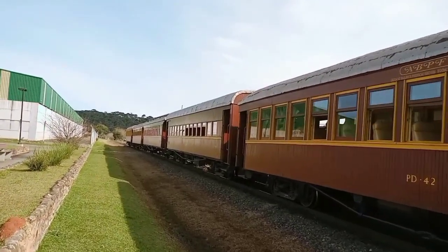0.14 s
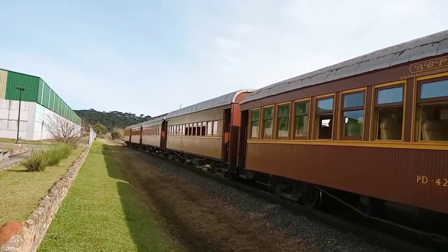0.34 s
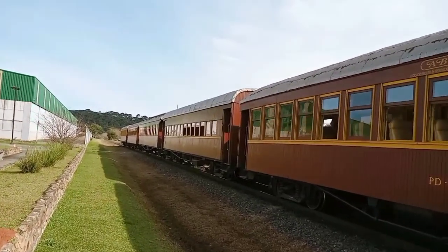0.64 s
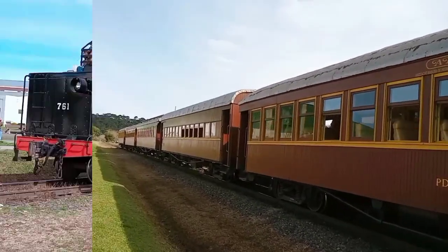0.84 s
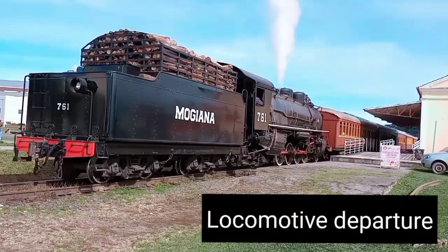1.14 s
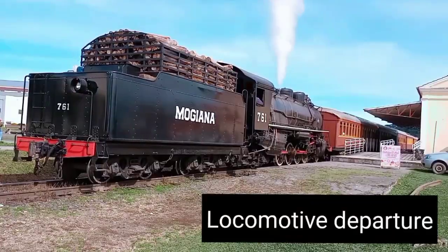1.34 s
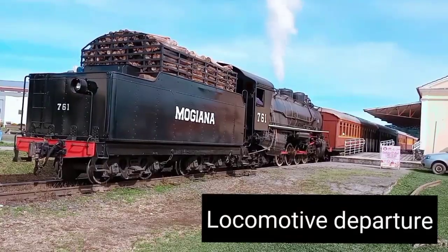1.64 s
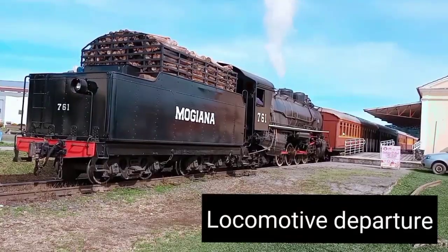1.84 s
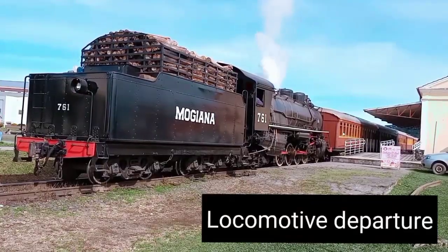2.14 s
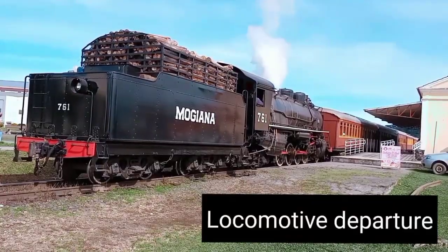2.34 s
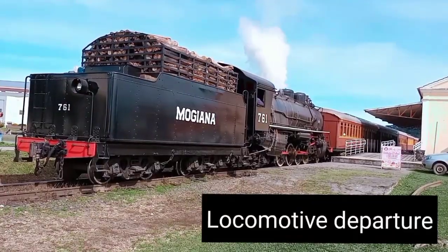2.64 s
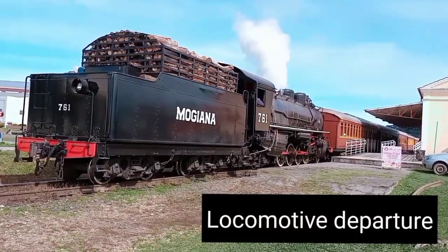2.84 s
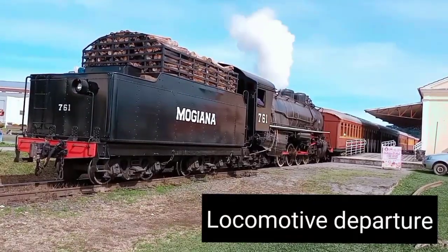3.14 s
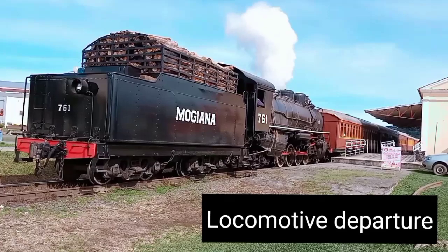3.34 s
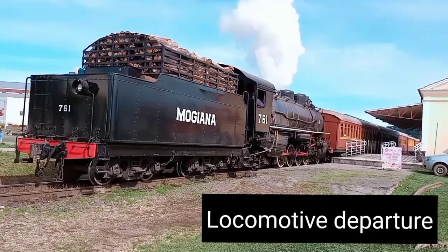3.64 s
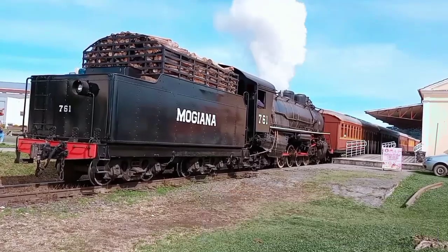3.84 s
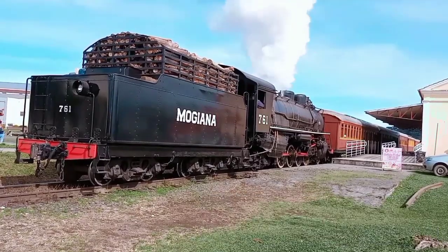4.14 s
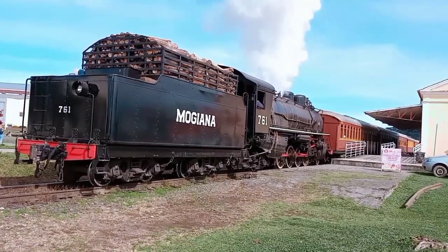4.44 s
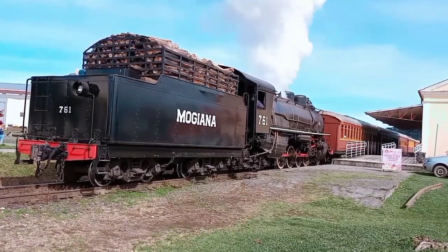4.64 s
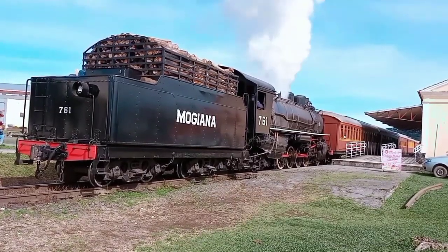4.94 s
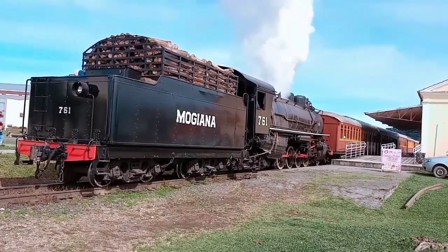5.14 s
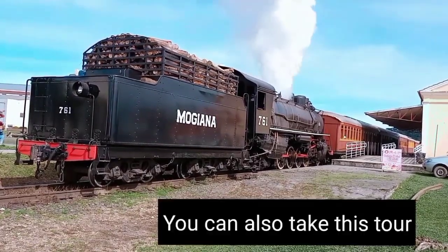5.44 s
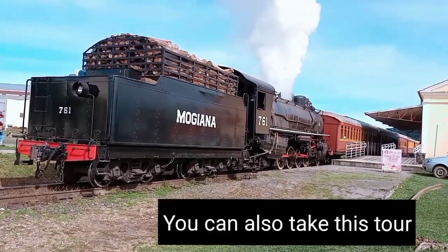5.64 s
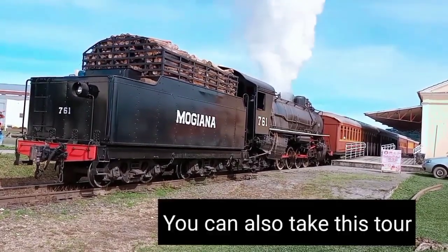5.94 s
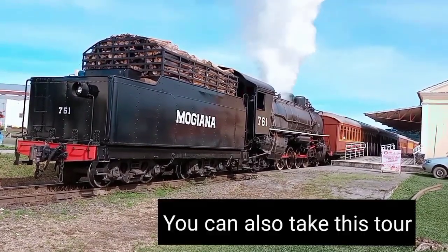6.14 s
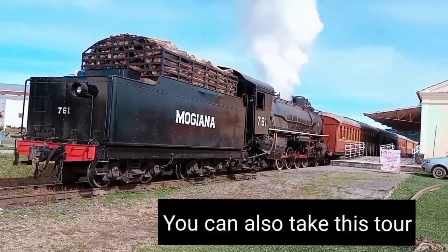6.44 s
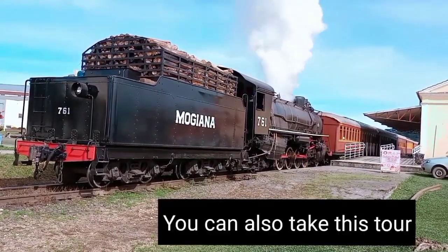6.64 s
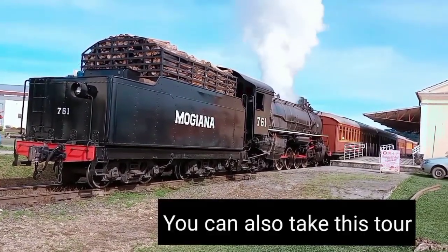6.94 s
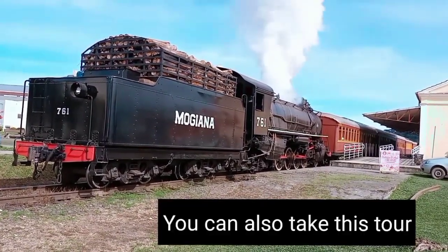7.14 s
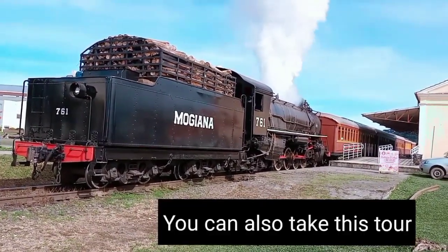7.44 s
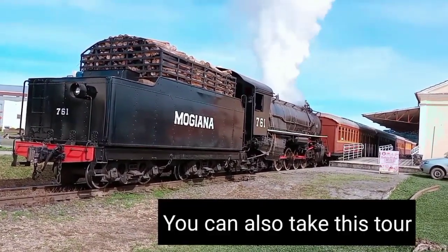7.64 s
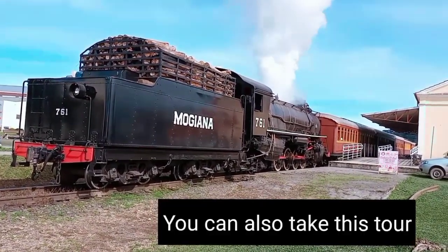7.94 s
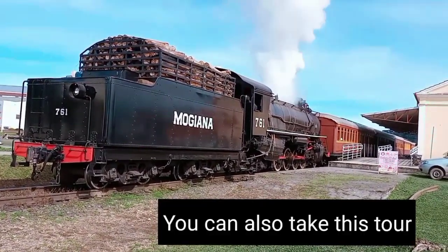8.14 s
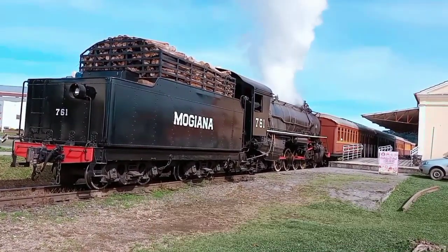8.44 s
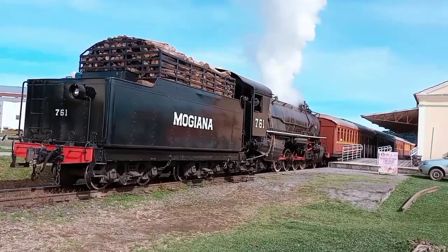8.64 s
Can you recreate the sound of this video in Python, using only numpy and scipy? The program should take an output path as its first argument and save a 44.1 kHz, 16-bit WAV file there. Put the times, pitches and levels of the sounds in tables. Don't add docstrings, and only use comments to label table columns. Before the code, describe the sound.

Quiet wind and faint coupling clinks beside a train, then close steam hiss and a long, loud chorded steam whistle held to the end.

```python
import sys
import numpy as np
from scipy import signal
from scipy.fft import rfft, irfft, next_fast_len
from scipy.io import wavfile
from scipy.ndimage import map_coordinates

SR = 44100
rng = np.random.default_rng(int(sys.argv[2]) if len(sys.argv) > 2 else 0)


def transcribe(signal):
    frames = np.atleast_2d(signal).T
    limited = np.clip(frames, -1, 1)
    pcm = np.round(limited * 32767).astype(np.int16)
    wavfile.write(sys.argv[1], SR, pcm)


def amplitude_ratio(level_db):
    exponent = np.asarray(level_db, float) / 20
    return 10 ** exponent


N = 388080
SECONDS = np.arange(N) / SR
LEFT_ONLY = np.array([[1], [0]])


def unit(x):
    return x / np.sqrt(np.mean(x ** 2, axis=-1, keepdims=True) + 1e-20)


def along(points, hz):
    f, v = np.transpose(points)
    return np.interp(np.log(hz + 1), np.log(f + 1), v)


def curves(rows):
    s, *cols = np.transpose(rows)
    return [np.interp(SECONDS, s, c) for c in cols]


def span(start_s, end_s, fade_s):
    return np.clip((SECONDS - start_s) / fade_s, 0, 1) * np.clip((end_s - SECONDS) / fade_s + 1, 0, 1)


def span_of(rows, fade_s):
    return span(rows[0][0], rows[-1][0], fade_s)


def bump(at_s, half_s):
    return np.exp(-((SECONDS - at_s) / half_s) ** 2)


def wobble(rate):
    knots = rng.standard_normal(int(N * rate / SR) + 4)
    return map_coordinates(knots, [np.arange(N) * rate / SR])


def leaning(db):
    return amplitude_ratio(np.array([[.5], [-.5]]) * db)


def filtered(x, response):
    m = next_fast_len(N + SR // 4)
    return irfft(rfft(x, m) * response(np.fft.rfftfreq(m, 1 / SR)), m)[..., :N]


def noise(spectrum, channels):
    def shape(hz):
        inside = (hz > spectrum[0][0]) * (hz < spectrum[-1][0])
        return amplitude_ratio(along(spectrum, hz)) * inside
    return unit(filtered(rng.standard_normal((channels, N)), shape))


# frequency in Hz, left minus right in dB.
MIC_BALANCE = [(40, 15), (150, -16.5), (280, -12), (450, 1), (1000, 0), (3500, 0.5), (5500, -0.5),
               (7500, -13), (10500, -6.5), (13000, 0)]
# frequency in Hz, likeness of left and right from 0 to 1.
BROAD_ALIKE = [(100, 0.3), (250, 0.37), (400, 1), (700, 0.38), (1200, 0), (2000, 0.22), (2900, 0.43),
               (5800, 0.47), (7500, 0), (14000, 0)]


def rush(spectrum, alike=BROAD_ALIKE):
    def shares(hz):
        turn = np.arccos(np.clip(along(alike, hz), 0, 1)) / 2
        return np.array([np.cos(turn), np.sin(turn)])
    same, apart = filtered(noise(spectrum, channels=2), shares)
    pair = np.array([same + apart, same - apart])
    return filtered(pair, lambda hz: leaning(along(MIC_BALANCE, hz)))


# time in seconds, opening from 0 to 1.
WHISTLE_VALVE = [
    (2.0, 0),
    (2.3, .5),
    (3.2, .7),
    (3.8, 1),
]


def whistle_opening():
    return curves(WHISTLE_VALVE)[0]


# time in seconds, strength in dB.
WIND_STRENGTH = [(0, -59), (.05, -53.5), (.2, -55.5), (.29, -52), (.5, -57), (.57, -63), (.64, -61),
                 (.78, -62.5), (.94, -77)]
# frequency in Hz, density in dB per Hz.
BOOM_SPECTRUM = [(25, -22), (60, -2.5), (110, 4), (150, -8), (250, -21), (700, -23), (1500, -45)]
# frequency in Hz, density in dB per Hz.
FLUTTER_SPECTRUM = [(50, -26), (120, -8), (200, -1.5), (400, -6), (800, -17.5), (1500, -27)]
# time in seconds, rise in dB.
RIGHT_GUSTS = [(.0, 9), (.14, 4.5), (.285, 5), (0.499, 11), (.638, 7.5), (.74, 3), (.92, 6)]
# time in seconds, rise in dB.
LEFT_GUSTS = [(.125, 2), (.22, 3), (.28, 7), (.33, 2.5), (.465, 7), (.59, 9), (.645, 2), (.78, 0)]


def wind():
    right_gust_s, left_gust_s = 0.088, 0.012
    boom_level_db, boom_follows_wind = -58.5, 0.39
    strength_db, = curves(WIND_STRENGTH)
    flutter_db = strength_db + sum(db * bump(s, left_gust_s) for s, db in LEFT_GUSTS)
    boom_db = boom_level_db + boom_follows_wind * (strength_db - strength_db.max())
    boom_db = boom_db + sum(db * bump(s, right_gust_s) for s, db in RIGHT_GUSTS)
    lumps = amplitude_ratio(1.2 * np.array([wobble(42.1), wobble(15.6)]))
    flutter = amplitude_ratio(flutter_db + 6.5) * noise(FLUTTER_SPECTRUM, channels=1)
    boom = amplitude_ratio(boom_db + 4.5) * noise(BOOM_SPECTRUM, channels=1)
    since_change_s = np.clip(SECONDS - WIND_STRENGTH[-1][0], 0, 9)
    tail = amplitude_ratio(2.5 * since_change_s - 43 * whistle_opening())
    return tail * np.vstack([flutter, boom]) * lumps


# frequency in Hz, density in dB per Hz.
FAR_SPECTRUM = [(300, -18), (600, -11), (1200, -9), (2000, -11.5), (4000, -11), (8500, -15), (11000, -21),
                (15500, -33)]


def far_hiss():
    level_db, fade_from_s, fade_db_per_s = -62.5, 0.56, -15
    far_db = level_db + fade_db_per_s * np.clip(SECONDS - fade_from_s, 0, 1)
    return span_of(WIND_STRENGTH, fade_s=0.0011) * amplitude_ratio(far_db + 4.5) * rush(FAR_SPECTRUM)


# time in seconds, pitch in Hz, half length in seconds, level in dB.
COUPLINGS = [
    (0.39, 420, .07, -68),
    (0.51, 830, .05, -58),
    (.22, 750, .04, -67),
]
# frequency in Hz, density in dB per Hz.
TICK_SPECTRUM = [(6000, -20), (10000, -3), (15000, 0), (15500, -6)]


def yard_noises():
    tick_s, tick_db, tick_half_s = .832, -58, .002
    rings = sum(amplitude_ratio(db) * bump(s, half_s) * np.sin(2 * np.pi * hz * SECONDS)
                for s, hz, half_s, db in COUPLINGS)
    tick = amplitude_ratio(tick_db) * bump(tick_s, tick_half_s) * noise(TICK_SPECTRUM, channels=2)
    return rings * amplitude_ratio([[-8], [0]]) + tick


# time in seconds, peak in dB, pitch
# in Hz.
PORT_KNOCKS = [
    (0.279, -34, 109),
    (1.62, -50, 200),
    (2.069, -57, 45),
]


def knocks():
    out = np.zeros((2, N))
    for s, db, hz in PORT_KNOCKS:
        cycles = (SECONDS - s) * hz
        slowness = 110 / hz
        fade = np.exp(-1.5 * (cycles * slowness) ** 2 * slowness ** 2)
        out[1] -= amplitude_ratio(db) * np.cos(2 * np.pi * cycles) * fade
    return out


# time in seconds, half length in seconds, rise in dB.
DRY_SWELLS = [
    (5.75, 0.17, 7.5),
    (8.78, 0.11, 6),
    (3.7, 0.13, 0),
]


def squall():
    return sum(db * bump(s, half_s) for s, half_s, db in DRY_SWELLS)


# time in seconds, level in dB.
JET_LEVEL = [(0.94, -50), (1.2, -45.5), (1.55, -43), (2.06, -43.5), (2.14, -50), (2.56, -51.5), (2.74, -48),
             (2.91, -48.5), (3.37, -40.5), (3.72, -40), (4.57, -38.5), (5.1, -37), (5.29, -38), (5.84, -39),
             (5.93, -38.5), (7.61, -40.5), (8.4, -38.5), (8.8, -37.5)]
# time in seconds, fizz over jet in dB.
DRYNESS = [(1.55, 4.5), (1.68, 0), (2.3, 0), (2.9, -1.5), (4.5, -3.5), (6.3, -2.5), (8.8, -3.5)]
# frequency in Hz, density in dB per Hz.
VALVE_SPECTRUM = [(300, -33), (600, -38), (850, -7.5), (1300, -9.5), (1600, -7.5), (1900, -3.5),
                  (2700, -1.5), (5300, -1.5), (6100, -3.5), (8000, -11)]
# frequency in Hz, density in dB per Hz.
BLAST_SPECTRUM = [(300, -17.5), (500, 1.5), (800, -2), (1100, -8), (1500, -7.5), (1850, -4.5), (2200, -7),
                  (3000, -6.5), (5000, -9), (6500, -12), (8000, -23.5)]
# frequency in Hz, density in dB per Hz.
FIZZ_SPECTRUM = [(4500, -23), (6000, -9), (8000, 1.5), (11000, -1), (13500, -0.5), (15500, -4)]
# frequency in Hz, density in dB per Hz.
ROAR_SPECTRUM = [(20, -31), (50, -35), (110, -5.5), (200, 1), (330, 7.5), (450, -38)]
# frequency in Hz, density in dB per Hz.
SQUALL_SPECTRUM = [(2100, -20), (2500, -3), (2850, 0), (3200, -20)]
# frequency in Hz, likeness of left and right from 0 to 1.
NARROW_JET_ALIKE = [(400, .8), (1000, 0.74), (1500, 0.5), (2100, 0.34), (3000, 0.57), (5000, 0.16),
                    (5800, 0.35), (7500, 0.34), (9500, 0.16), (11300, 0), (12000, 0.5), (13500, .35),
                    (15000, .1)]


def steam():
    valve_left_db, fizz_left_db = 2.5, 3.5
    (jet_db,), (dry_db,), opening = curves(JET_LEVEL), curves(DRYNESS), whistle_opening()
    surge_db = 0.51 * wobble(7.7) + 0.68 * wobble(60) + 0.31 * wobble(3.9)
    valve = rush(VALVE_SPECTRUM, NARROW_JET_ALIKE) * leaning(valve_left_db)
    blast = amplitude_ratio(2.0) * rush(BLAST_SPECTRUM)
    jet = np.sqrt(np.abs(1 - opening)) * valve + np.sqrt(np.abs(opening)) * blast
    fizz = rush(FIZZ_SPECTRUM, NARROW_JET_ALIKE) * leaning(fizz_left_db * (1 - opening))
    hiss = amplitude_ratio(jet_db + 3.5 + surge_db) * jet + amplitude_ratio(jet_db + dry_db + surge_db) * fizz
    hiss = hiss + amplitude_ratio(-42) * np.abs(amplitude_ratio(squall()) - 1) * rush(SQUALL_SPECTRUM)
    roar_db = -56 + 2.23 * np.minimum(jet_db + 40, 0) - 6.5 * (1 - opening) - 10 * bump(2.95, .25)
    roar = amplitude_ratio(roar_db + 1.3 * wobble(3.87) + 1.06 * wobble(9)) * rush(ROAR_SPECTRUM)
    return span_of(JET_LEVEL, fade_s=0.0014) * (hiss + roar)


# start in seconds, end in seconds, centre in Hz, half width in Hz.
HISS_GAPS = [
    (.95, 1.62, 6000, 220),
    (1.0, 1.6, 3400, 110),
    (1.57, 1.97, 12150, 300),
    (2.65, 3.55, 12150, 330),
]


def hollowed(x):
    shut_share = 0.5
    for start_s, end_s, hz, half_hz in HISS_GAPS:
        flicker = np.clip(3 * (shut_share + wobble(18)), 0, 1)
        band = filtered(x, lambda f: np.exp(-((f - hz) / half_hz) ** 4))
        x = x - span(start_s, end_s, fade_s=.02) * flicker * band
    return x


# time in seconds, level in dB.
MOUTH_LEVEL = [(.94, -65), (1.4, -59.5), (1.68, -54), (2.04, -52), (2.3, -49), (2.6, -51), (3.3, -46),
               (3.8, -43), (8.8, -58)]
# frequency in Hz, density in dB per Hz.
LOW_MOUTH_SPECTRUM = [(380, -16), (430, -7), (600, -6.5), (700, -5.5), (780, -20)]
# frequency in Hz, density in dB per Hz.
HIGH_MOUTH_SPECTRUM = [(940, -27), (1030, -5), (1150, -7), (1300, -17)]


def mouths():
    low_db, = curves(MOUTH_LEVEL)
    share = np.clip(2 * whistle_opening(), 0, 1)
    high_db = (1 - share) * (low_db - 15) + share * -49.5
    breath = amplitude_ratio(low_db) * rush(LOW_MOUTH_SPECTRUM)
    breath = breath + amplitude_ratio(high_db) * rush(HIGH_MOUTH_SPECTRUM, NARROW_JET_ALIKE)
    return span_of(MOUTH_LEVEL, fade_s=.002) * amplitude_ratio(1.6 * wobble(16)) * breath


# time in seconds, level in dB.
PUMP_LEVEL = [
    (1.0, -75),
    (1.22, -69),
    (1.666, -55.5),
    (1.758, -56.5),
    (1.8, -73),
]


def pump():
    idle_hz, sag_hz_per_db, second_db = 89.4, -0.2, -68.5
    db, = curves(PUMP_LEVEL)
    hz = idle_hz - sag_hz_per_db * (db - db.min()) + 2.5 * wobble(20)
    phase = 2 * np.pi * np.cumsum(hz) / SR
    hum = amplitude_ratio(db + 7.0) * np.sin(phase)
    hum = hum + amplitude_ratio(second_db + 3.0 + 3.6 * wobble(9.2)) * np.sin(2 * phase)
    return span_of(PUMP_LEVEL, fade_s=0.034) * hum * amplitude_ratio(2.6 * wobble(36.1)) * amplitude_ratio([[-24], [0]])


# time in seconds, pitch in Hz, level in dB.
LEAK_CHIRPS = [
    (1.42, 634, -56),
    (1.66, 650, -57),
    (1.84, 698, -62),
    (1.92, 614, -61),
    (2.03, 690, -60),
]


def leaking_bell():
    waver = 2 * np.pi * np.cumsum(14 * wobble(50)) / SR
    murmur = sum(amplitude_ratio(db + 2.0) * bump(s, half_s=0.031) * np.sin(2 * np.pi * hz * SECONDS + waver)
                 for s, hz, db in LEAK_CHIRPS)
    return murmur * amplitude_ratio(3.5 * wobble(25.5))


# time in seconds, pressure from 0 to 1, warming of the brass from 0 to 1.
BELL_STEAM = [(2.05, .1, 0), (2.14, 0, 0), (2.35, 0, 0), (2.5, .08, 0), (2.8, .44, 0), (2.97, .5, 0),
              (3.2, .65, 0), (3.4, .745, 0), (3.58, .85, 0), (3.72, .95, 0), (3.82, .975, 0), (4.0, 1, 0),
              (4.9, 1, .35), (5.2, 1, .15), (6.4, 1, .45), (6.7, 1, .85), (7.5, 1, .45), (8.3, 1, .88),
              (8.8, 1, 1)]
# pitch on weak steam in Hz, pitch at full pressure in Hz,
# lateness of the climb as a power, warming gain in Hz.
BELL_PITCH = [
    (358.5, 368, 4, 2.5),
    (449.5, 464.8, 5.5, 4),
    (511, 566, 1.05, 9),
    (546, 629, 1.35, 7.5),
    (571, 722, 1, 4.5),
]
# time in seconds, five peak levels in dB, longest bell first.
BELL_STRENGTH = [(2.12, -67.0, -41.5, -36, -49, -42), (2.3, -78, -42.5, -29.5, -52, -37.5),
                 (2.5, -69, -40, -34.5, -42, -38), (2.62, -75, -46, -27.5, -38, -40),
                 (2.74, -44.5, -39, -29, -32, -33.5), (2.95, -39, -42.5, -27.5, -31, -34.5),
                 (3.15, -39, -39.5, -25.5, -31, -33.5), (3.35, -40, -39, -25.5, -31, -33),
                 (3.55, -50, -40, -23.5, -28, -34.5), (3.75, -53, -37.5, -22.5, -29.5, -31.5),
                 (3.95, -42.5, -40.5, -25, -30, -34.5), (4.4, -43, -40, -23.5, -27.0, -33),
                 (5, -42.5, -39, -23.5, -27.0, -33), (5.6, -42.5, -38.0, -24.5, -25.5, -33.0),
                 (6.2, -45, -41.5, -22, -26, -34.5), (7, -49, -38.5, -24, -28.5, -34.0),
                 (7.7, -48, -40.5, -23, -25, -32.5), (8.3, -49, -41.5, -23.0, -28, -33.5),
                 (8.7, -44.5, -39.0, -24.5, -29, -36)]


def bells():
    pressure, warm = curves(BELL_STEAM)
    hz = [weak_hz + (full_hz - weak_hz) * pressure ** lateness + warm_hz * warm
          for weak_hz, full_hz, lateness, warm_hz in BELL_PITCH]
    db = [level_db + .15 * wobble(2.985) for level_db in curves(BELL_STRENGTH)]
    scoop_s, scoop_half_s = 2.08, .075
    hz[1] = hz[1] * (1 - .056 * bump(scoop_s, scoop_half_s))
    hz[4] = hz[4] * (1 + .055 * bump(scoop_s + .04, scoop_half_s * .8))
    hz[3] = hz[3] - 7 * bump(2.8, .2)
    return hz, db


# time in seconds, size from 0 to 1.
PLUME_SIZE = [
    (5.7, 0.21),
    (6.2, 0.88),
]
# frequency in Hz, lead at the left microphone in radians.
OVERTONE_LEAD = [(930, -1), (1120, -0.4), (1260, 0), (1450, 0.52), (1700, -2), (1900, -2.5), (2300, -0.8)]
# frequency in Hz, left minus right in dB.
OVERTONE_BALANCE = [(930, -9), (1120, -2.5), (1260, 4), (1450, -3), (1750, -6), (1900, -7.5), (2300, -2.5),
                    (3000, 3)]
# change in dB, further change on the first trickle in dB.
WEAK_OCTAVE = [(-6, 2), (0.5, -5.5), (-8, 14), (2, 18.5), (-4.5, -25)]


def overtones(bell, phase, over_db, pan_db, weak):
    plume, = curves(PLUME_SIZE)
    dry_db, out = squall(), 0
    for k, level_db in enumerate(over_db):
        harmonic = k + 2
        hz = harmonic * BELL_PITCH[bell][1]
        if k:
            weak_db = -15.5 * k * weak
        else:
            weak_db = np.dot(WEAK_OCTAVE[bell], [weak, weak ** 4])
        grown_db = level_db + weak_db - 1.3 * plume + 0.24 * k * dry_db + 1.7 * wobble(11)
        lead = along(OVERTONE_LEAD, hz) + (.3 + .3 * k) * (1 - weak) * wobble(16)
        balance = leaning(along(OVERTONE_BALANCE, hz) - pan_db)
        out = out + amplitude_ratio(grown_db) * balance * np.sin(harmonic * phase + LEFT_ONLY * lead)
    return out


# bell added, bell added,
# bell taken away, level in dB, change behind the grown plume in dB.
CHAMBER_TONES = [(2, 2, 3, -52, 7), (3, 4, 2, -47, 0), (2, 4, 3, -47, 0), (2, 2, 4, -58, 4)]


def combination_tones(phases, closed):
    plume, = curves(PLUME_SIZE)
    out = np.zeros((2, N))
    for one, two, minus, db, plume_db in CHAMBER_TONES:
        level_db = db + 2 + plume_db * plume - 60 * closed + 2.3 * wobble(4.9)
        phase = phases[one] + phases[two] - phases[minus]
        out -= amplitude_ratio(level_db) * np.sin(phase + LEFT_ONLY * 0.094 * wobble(13.0))
    return out


# phase wander in radians, then harmonics 2 to 6 in dB.
BELL_VOICING = [(0.53, -26, -2.5, -10, -10, -28), (0.62, -7.5, -6.5, -23, -10.5, -14),
                (0.045, -23, -32, -39, -32.5, -52), (0.12, -22.5, -19, -23.5, -22.5, -42),
                (0.2, -9.5, -27, -20, -40, -40)]
# time in seconds, five left minus right levels in dB.
BELL_LEAN = [(2.2, -2.5, 4, 4.5, 7, -4), (2.6, -4.0, 1, -0.0, -4.5, -3), (3, -5.5, 1, -0.5, 4, 1),
             (3.4, -5.0, 5, -1.5, 2, 2.5), (3.9, -9, 0, 0, 3, -4), (4.4, -9, -2, -0.5, 1.5, 0),
             (4.9, -7.5, -4, -3.5, 1.5, 4), (5.3, -11, 7, -4.5, 0.5, 1.0), (5.7, -7.5, -3, -3.5, 1, 3.5),
             (6.1, -11, -3.0, -3, 1.5, 4.0), (6.6, -12, -6, -1.5, 0.5, 4.5), (7.1, -7, -8.5, -1.5, -1.5, 6),
             (7.6, -9, -2, -5, 3, 1.5), (8.1, -9, -7, -3, -2, 3), (8.6, -6, 0, 1.5, -4.5, 11)]
# time in seconds, five leads in radians.
BELL_LEAD = [(2.15, -0.04, 0.3, 0.0033, -0.23, -0.12), (2.4, -2, -1, -0.26, -0.67, -0.3),
             (2.7, 0.1, -0.2, -0.099, -0.49, -0.33), (3.0, -0.2, 0.1, 0.096, -1.7, -0.0042),
             (3.2, 0.4, -0.8, -0.2, 0.12, -0.11), (3.4, -0.5, 1, -0.044, -0.041, -0.15),
             (3.6, 0.2, 0, -0.15, -0.03, -0.27), (3.8, -0.3, 2, -0.32, -0.25, -0.3),
             (4.1, 0.14, 0.5, -0.37, 0.016, 0.073), (4.5, 0.2, 1.3, -0.45, -0.16, -0.25),
             (4.95, -0.4, 1, -0.0026, -0.29, -0.36), (5.25, 0, 1, -0.65, -0.33, 0.11),
             (5.6, 0, 0.3, -0.28, -0.5, 0.1), (5.9, -0.2, 2, -0.087, -0.37, 0.04),
             (6.3, -0.31, 4.1, -0.23, -0.57, -0.073), (6.8, 3, 4, 0.088, -0.46, 0.012),
             (7.3, 3.5, 4.5, 0.19, -0.47, -0.13), (7.8, 5, 4, -0.15, -0.58, -0.087),
             (8.3, 7.46, 3.5, 0.18, -0.48, -0.3), (8.7, 8.5, 4, 0.0051, -0.86, -0.71)]


def whistle():
    chord, phases = np.zeros((2, N)), []
    opening = whistle_opening()
    closed = np.clip(1 - opening, 0, 1)
    weak = 1 - curves(BELL_STEAM)[0]
    headroom_db = 2.5 * opening ** 4
    chamber_hz = 0.6294 * wobble(10) + 1.31 * wobble(60)
    voices = zip(*bells(), curves(BELL_LEAN), curves(BELL_LEAD), BELL_VOICING)
    for bell, (hz, db, pan_db, lead, (wander, *over_db)) in enumerate(voices):
        lip_hz = .3 + 2.2 * closed
        if bell == 4:
            lip_hz = lip_hz + 1.2 + 4 * closed
        flutter_hz = chamber_hz + .25 * wobble(10) + lip_hz * wobble(60)
        phase = 2 * np.pi * np.cumsum(hz + flutter_hz) / SR
        phases.append(phase)
        root = phase + LEFT_ONLY * ((1 - weak) * 0.78 * wander * wobble(13) + lead)
        over = overtones(bell, phase, over_db, pan_db, weak)
        breath = (0.01 + 0.079 * closed) * (wobble(90) * np.sin(root) + wobble(90) * np.cos(root))
        tone = np.sin(root) + amplitude_ratio(0.84 * closed) * over + breath
        shake_db = [[0.38 + 2.4 * wander], [0.14 + 1.8 * wander]] * np.array([wobble(8), wobble(7.6)])
        shake = amplitude_ratio(shake_db * (1 - 0.35 * weak))
        chord += amplitude_ratio(db + headroom_db) * tone * shake * leaning(pan_db)
    chord += combination_tones(phases, closed)
    return chord * span(2.065, 9, fade_s=0.032)


# frequency in Hz, time to fall 60 dB in seconds.
YARD_DECAY = [(200, 0.4), (700, 0.69), (3000, 0.46), (10000, 0.11)]


def yard(x):
    hz, t, z = signal.stft(rng.standard_normal((2, SR)), SR, nperseg=256)
    decay = amplitude_ratio(-60 * t / along(YARD_DECAY, hz)[:, None])
    tail = signal.istft(z * decay, SR, nperseg=256)[1]
    delayed = np.pad(x, ((0, 0), (1200, 0)))
    return signal.fftconvolve(delayed, tail / np.linalg.norm(tail[0]), axes=1)[:, :N]


# frequency in Hz, lead in radians.
CASE_SHADOW = [(300, 0), (600, 0.6144), (730, 1.5), (930, 1.6), (1120, 4), (1400, 4), (1800, 2.5),
               (2700, 1), (3800, -0.04), (4900, -1), (5800, 0), (7500, 3), (9500, 0.8), (10500, 1),
               (11500, 2.5), (12000, 2), (12600, 5), (13500, 8.5)]


def late(x, lag_s):
    def turn(hz):
        return np.exp(1j * np.outer([1, 0], along(CASE_SHADOW, hz) - 2 * np.pi * lag_s * hz))
    return filtered(x, turn)


def scene():
    chord = whistle()
    engine = late(chord + hollowed(steam() + leaking_bell()) + mouths(), lag_s=0.000753)
    echo = amplitude_ratio(-23) * yard(chord)
    return engine + echo + pump() + wind() + far_hiss() + knocks() + yard_noises()


def top_cut(x):
    return signal.sosfilt(signal.butter(12, 16180, fs=SR, output="sos"), x)


def record(dry):
    ceiling, knee = amplitude_ratio(-17.5), 2.6
    bent = dry / (1 + np.abs(dry / ceiling) ** knee) ** (1 / knee)
    mix = filtered(bent, lambda hz: (hz < 15500) * hz ** 2 / (hz ** 2 + 22 ** 2))
    return top_cut(mix)


dry = scene()
out = record(dry)
transcribe(out)
```